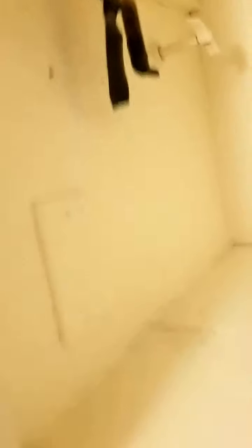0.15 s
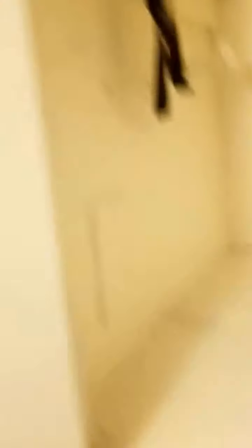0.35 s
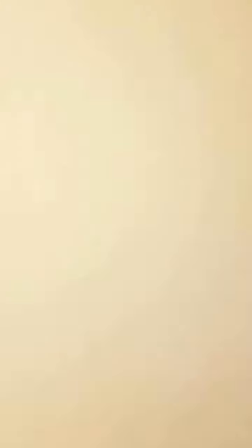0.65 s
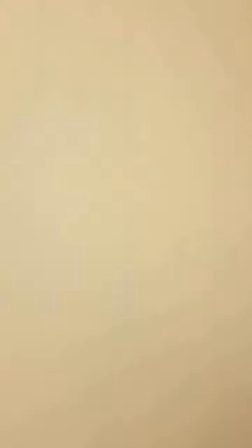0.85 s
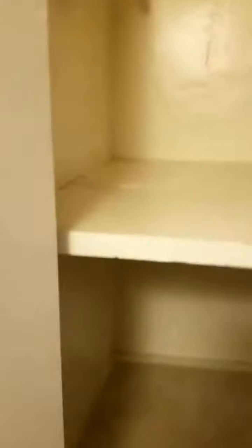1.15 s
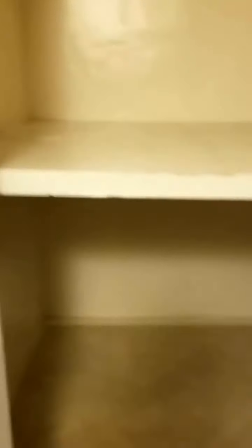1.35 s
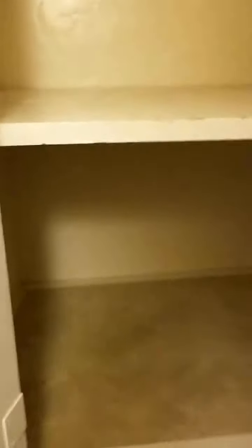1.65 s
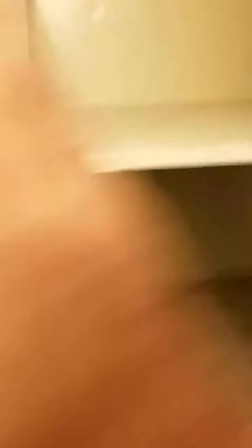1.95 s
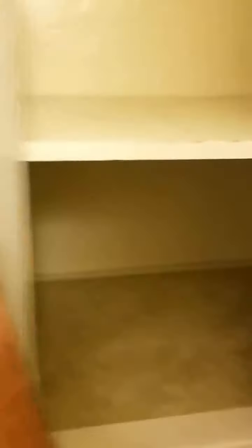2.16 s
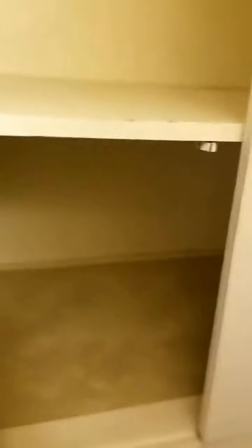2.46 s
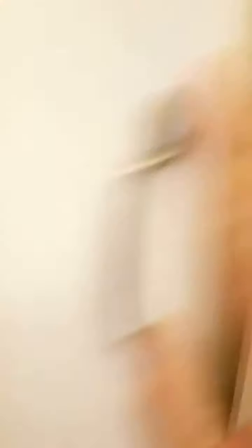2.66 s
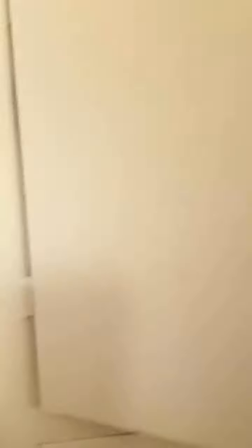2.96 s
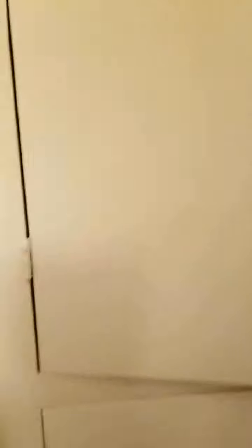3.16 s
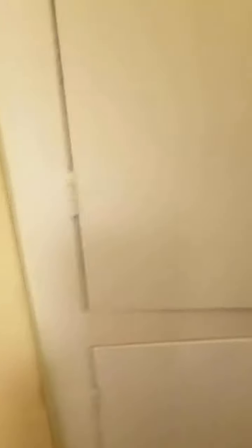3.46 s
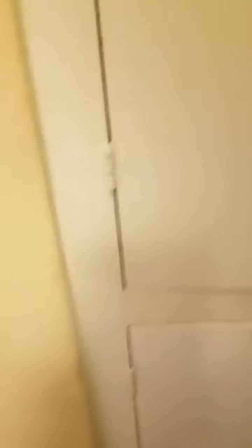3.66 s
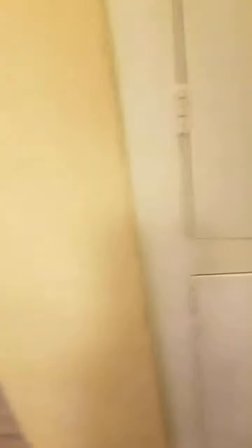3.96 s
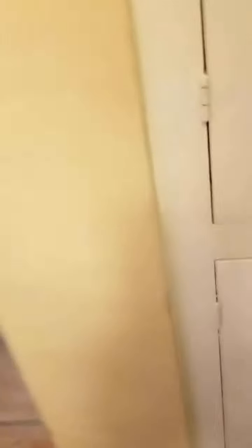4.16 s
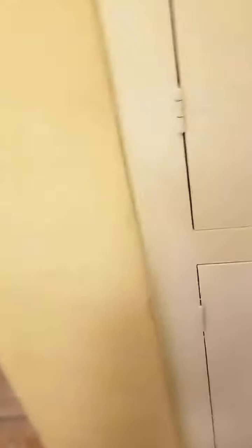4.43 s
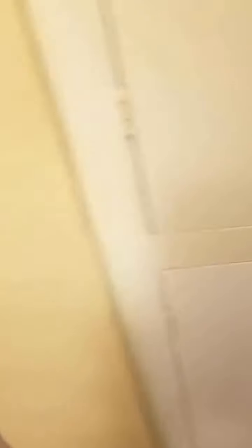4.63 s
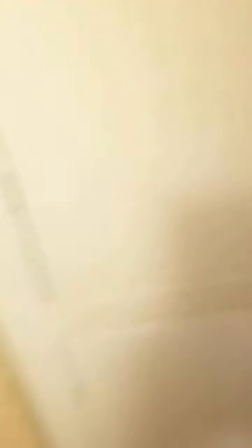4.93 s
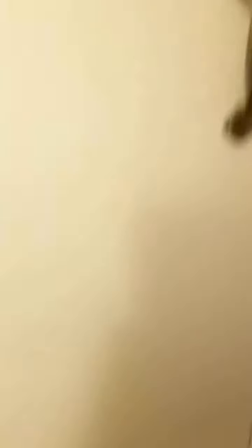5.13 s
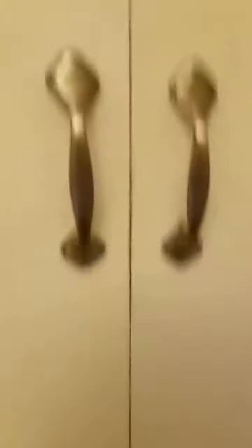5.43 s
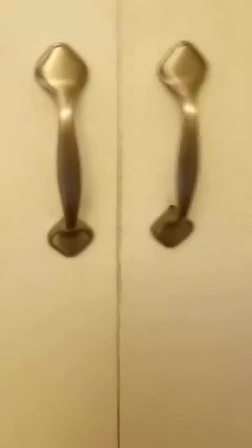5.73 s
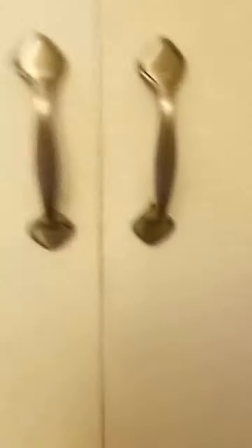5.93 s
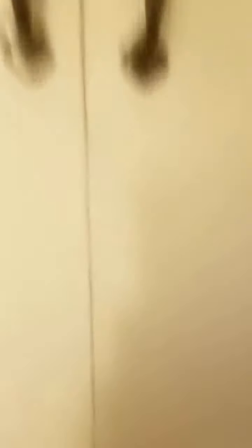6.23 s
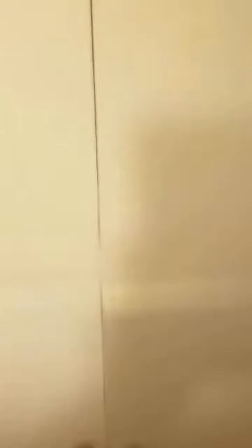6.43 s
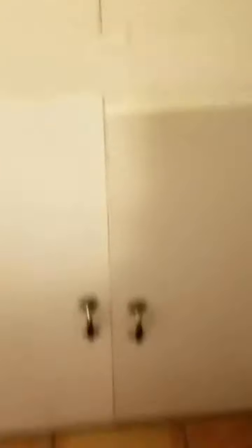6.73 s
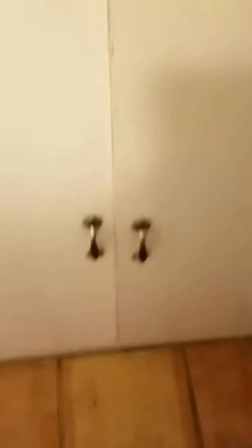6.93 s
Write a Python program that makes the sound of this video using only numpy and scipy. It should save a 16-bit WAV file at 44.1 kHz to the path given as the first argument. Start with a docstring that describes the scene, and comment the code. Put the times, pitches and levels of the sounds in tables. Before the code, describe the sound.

In a bare hallway, a soft knock and a footstep come before a wooden cupboard door slams close by with a sharp metal snap. About two seconds later a second door bangs shut, then a third, deeper one rattles into its catch. Each bang echoes for over a second. Afterwards there are only faint sleeve rustles, light taps and a dull step over a quiet room hush.

```python
"""Cupboard doors slammed in an empty house

Three wooden cupboard doors slam one after another in a bare hall. Each hits its frame, rebounds and
rattles: every contact is a crack of noise over booming panel modes, and the hall rings on for over a
second. Metal catches snap and clack. Between the slams someone steps about, handles the doors and
rustles a sleeve, over the hush of the rooms."""
import sys
import numpy as np
from scipy import signal
from scipy.fft import irfft
from scipy.io import wavfile
from scipy.ndimage import uniform_filter1d, minimum_filter1d

SR = 44100
rng = np.random.default_rng(int(sys.argv[2]) if len(sys.argv) > 2 else 0)


def output_pcm(signal):
    """Save a mono or channel-first signal as 16-bit PCM at the path in sys.argv[1].

    Samples are clipped to [-1, 1] before scaling.
    """
    pcm = np.clip(np.atleast_2d(signal).T, -1, 1) * 32767
    wavfile.write(sys.argv[1], SR, np.round(pcm).astype(np.int16))


N = 312644
MIC_GAP_M, SOUND_M_PER_S = 0.17, 343
RING = 2 ** 16  # samples given to one blow and its tail
RING_HZ, RING_S = np.fft.rfftfreq(RING, 1 / SR) + 1e-3, np.arange(RING) / SR
SCENE_HZ = np.fft.rfftfreq(N, 1 / SR) + 1e-3


def gain_of(db):
    """Decibels to amplitude."""
    return np.exp(np.asarray(db) * (np.log(10) / 20))


def curve(points, hz):
    """An EQ curve: points joined by straight lines over log frequency."""
    point_hz, value = np.transpose(points)
    return np.interp(np.log(hz + 1), np.log(point_hz + 1), value)


def hump(hz, octaves, steepness=2.92):
    """A broad resonance in dB around hz; octaves scales its width."""
    return -10 * steepness * np.log10(1 + (np.log2(RING_HZ / hz) / octaves) ** 2)


def add(mix, time, sound):
    """Mixes a sound in at a time in seconds."""
    part = mix[:, max(round(time * SR), 0):][:, :sound.shape[-1]]
    part += sound[..., :part.shape[1]]


def diffuse(colour_db, size):
    """Spectrum of unit-rms noise arriving from all sides at two spaced microphones."""
    hz = np.fft.rfftfreq(size, 1 / SR) + 1e-3
    a, b = np.exp(2j * np.pi * rng.random((2, len(hz))))
    coherence = .98 * np.sinc(2 * hz * MIC_GAP_M / SOUND_M_PER_S)  # centred bass, wide treble
    mid, side = a * np.sqrt((1 + coherence) / 2), b * np.sqrt((1 - coherence) / 2)
    gain = gain_of(colour_db) * hz ** 4 / (hz ** 4 + 28 ** 4)  # the microphones lose the deepest bass
    return np.array([mid + side, mid - side]) * gain * size / np.sqrt(2 * np.sum(gain ** 2))


def diffuse_noise(colour_db, size):
    """Wide stereo noise of a given colour, at unit rms."""
    return irfft(diffuse(colour_db, size), size)


def strike(colour_db, ring, crack_db, crack_t60):
    """A blow as decaying noise: a crack, the wood and near walls, then the slower tail of the hall."""
    # How a blow dies away, by band; ring scales the wood's t60 and the hall's amplitude.
    # (band [Hz], rise [s], base wood t60 [s], hall t60 [s], base hall level [dB])
    bands = [(50.7, 0.075, 0.74, 1.7, -13), (140.7, 0.018, 0.7, 1.57, -13), (366, 0.0013, 0.71, 1.996, -7),
             (1000, 0.001, 0.62, 1.99, -8.5), (2660, .001, 0.47, 1.33, -5.5),
             (5000, 0.0012, 0.36, 0.8, -4.5), (9600, 0.00081, 0.36, .6, -26.5)]
    noise, out = diffuse(colour_db, RING), np.zeros((2, RING))
    log_centres = np.log([band[0] for band in bands])
    crack = gain_of(crack_db - 60 * RING_S / crack_t60)
    for share, (_, rise, wood_t60, hall_t60, hall_db) in zip(np.eye(len(bands)), bands):
        wood = gain_of(-60 * RING_S / (wood_t60 * ring))
        hall = gain_of(hall_db - 60 * RING_S / hall_t60) * ring  # a short tick hardly fills the hall
        envelope = np.sqrt(crack ** 2 + wood ** 2 + hall ** 2) * (1 - np.exp(-RING_S / rise))
        crossover = np.interp(np.log(RING_HZ), log_centres, share)
        out += irfft(noise * crossover, RING) * envelope
    return out


def bump(db, hz, octaves, attack_s, ring):
    """A small blow with one broad resonance and a softened attack, in the same hall as the doors."""
    blow = strike(hump(hz, octaves), ring, crack_db=-2, crack_t60=0.017)
    return gain_of(db) * blow * (1 - np.exp(-RING_S / attack_s))


def room_tone(level_db=-56):
    """The steady hush of the empty rooms."""
    # Colour of the hush (frequency [Hz], relative level [dB])
    hush = [(25, -4.5), (60, -2), (115, 0.5), (170, -9), (330, -13), (800, -17.5), (1700, -16),
            (3000, -10.5), (6700, -29), (9500, -39), (15000, -36.5)]
    return gain_of(level_db) * diffuse_noise(curve(hush, SCENE_HZ), N)


def sleeve(body_build_s=0.051, fizz_droop_db_per_s=25, grain_db=.5):
    """Sliding cloth: each stroke swells, holds and ebbs; its fizz comes first and its body builds after."""
    # Colour of rubbing cloth (frequency [Hz], relative level [dB])
    cloth = [(290, -47), (500, -25.5), (623, -15), (795, -14.5), (1630, -9.5), (1830, -6), (2230, -5),
             (3590, -2.5), (6570, -5), (8000, -12.5), (10400, -80), (17600, -120)]
    # Arm movements (start [s], rise [s], length [s], hiss level [dB], body offset [dB], fizz offset [dB])
    strokes = [(0.0, 0.009, 0.057, -62.5, -1, -3), (0.193, .12, 0.17, -45.5, 8.5, -2),
               (0.694, 0.067, 0.16, -51.5, 0, 0.5), (1.035, 0.044, 0.057, -59.5, 2, -1),
               (1.198, 0.055, 0.14, -40.5, 2.5, -4), (2.158, .03, 0.1, -59, -1, -2),
               (2.678, 0.049, .3, -68, 6.5, 3), (4.788, .006, .035, -47, 5.5, -1.5),
               (5.412, 0.018, 0.082, -62, 7, 2), (5.585, 0.079, 0.064, -49.5, -1, 1),
               (6.066, 0.038, .08, -59, 3, -8), (6.273, 0.067, 0.12, -54.5, 0.5, -4),
               (6.573, 0.056, 0.18, -47.5, 0, -4.5), (6.836, 0.037, 0.057, -53, -1, -2.5)]
    cloth_db = curve(cloth, SCENE_HZ)
    body = diffuse_noise(cloth_db - 20 * np.log10(1 + (SCENE_HZ / 3500) ** 4), N)
    hiss = diffuse_noise(cloth_db - 20 * np.log10(1 + (3800 / (SCENE_HZ + 1)) ** 4), N)
    fizz = diffuse_noise(curve([(5000, -44.5), (8000, 3.0), (15000, 4.5)], SCENE_HZ), N)
    grain = uniform_filter1d(rng.standard_normal(N), 200)
    powers = np.zeros((3, N))  # hiss, body, fizz
    for start, rise, length, db, body_db, fizz_db in strokes:
        age = np.maximum(np.arange(N) / SR - start, 0)
        ebb_t60 = 0.44 + 3.5 * length  # longer strokes ebb more slowly
        ebb_db = -60 * np.maximum(age - length, 0) / ebb_t60
        level = np.minimum(age / rise, 1) * gain_of(db + ebb_db)
        body_share = gain_of(body_db) * (1 - np.exp(-age / body_build_s))
        fizz_share = gain_of(fizz_db - fizz_droop_db_per_s * age)
        powers += np.square([level, level * body_share, level * fizz_share])
    rustle = sum(np.sqrt(power) * layer for power, layer in zip(powers, (hiss, body, fizz)))
    return rustle * gain_of(grain_db * grain / grain.std())


def air_puff(time_s=2.871, level_db=-22, pitch_hz=111, width_s=0.0025, right_share=0.085):
    """One soft push of air, felt mostly by the left microphone port."""
    t = np.arange(N) / SR - time_s
    push = np.cos(2 * np.pi * pitch_hz * t) * np.exp(-(t / width_s) ** 2 / 2)
    return gain_of(level_db) * np.array([[1], [right_share]]) * push


def steps():
    """Heavy feet draw a dull, low thud from the floor."""
    # Footfalls (time [s], level [dB])
    footfalls = [(.505, -35), (1.17, -49), (2.93, -50), (6.725, -29), (6.781, -36), (6.868, -46)]
    out = np.zeros((2, N))
    for time, db in footfalls:
        add(out, time, bump(db, hz=82, octaves=.6, attack_s=0.01, ring=.78))
    return out


def knocks():
    """Hands and door edges knock on the wood; shelves and floor shudder around one pitch after a jolt."""
    # Light knocks (time [s], level [dB], centre [Hz], attack [s], ring [factor])
    taps = [(.455, -42.5, 443, 0.0053, 0.55), (0.497, -32.5, 1000, 0.0013, 0.5),
            (1.149, -46.5, 480, 0.0054, 0.49), (2.75, -49, 800, 0.0054, 0.79),
            (3.146, -50.5, 500, 0.0022, 1.7), (3.181, -35, 1900, 0.00058, 0.45),
            (5.59, -48, 526, 0.034, 1.24), (5.74, -52.5, 297, 0.0079, 0.7)]
    # Jolted boards (time [s], level [dB], centre [Hz], ring [factor])
    shudders = [(3.8, -35, 166.6, 0.38), (4.23, -16.5, 187, 1), (6.74, -54.5, 534, 3.4)]
    out = np.zeros((2, N))
    for time, db, hz, attack_s, ring in taps:
        add(out, time, bump(db, hz, octaves=1.3, attack_s=attack_s, ring=ring))
    for time, db, hz, ring in shudders:
        add(out, time, bump(db, hz, octaves=0.58, attack_s=.0065, ring=ring))
    return out


def fittings():
    """Hinges tick, a sleeve flicks briefly, a door rebounds, a door edge scrapes its frame and the catches
    clack home."""
    # Ticks of hinges and loose fittings, and brief high flicks of a sleeve (time [s], level [dB], centre [Hz])
    ticks = [(.682, -57.5, 3020), (0.907, -43.5, 4300), (1.645, -55, 10000), (2.068, -53, 5460),
             (3.547, -49, 10000), (3.805, -46.5, 4020), (5.028, -58, 4200)]
    # Doors seating in their catches (time [s], level [dB])
    clacks = [(3.333, -19.5), (4.3217, -14.5)]
    out = np.zeros((2, N))
    for time, db, hz in ticks:
        add(out, time, bump(db, hz, octaves=0.94, attack_s=0.0017, ring=0.21))
    hollow_rebound = bump(db=-11.5, hz=380, octaves=.3, attack_s=.0015, ring=.2)
    add(out, 3.337, hollow_rebound)  # the second door against its frame
    edge_scrape = bump(db=-33, hz=4500, octaves=0.89, attack_s=.022, ring=0.62)
    add(out, 4.29, edge_scrape)  # the third door, just before it shuts
    for time, db in clacks:
        add(out, time, bump(db, hz=2350, octaves=.39, attack_s=0.00092, ring=0.24))
    return out


def metal_snaps(t60=0.009, rise_s=0.00043, echo_db=-22, echo_t60=0.1):
    """Metal catches and hinges snap for a few milliseconds, with a faint spray of echoes."""
    # Snaps of the metalwork (time [s], level [dB], centre [Hz])
    snaps = [(1.4665, -14.5, 3360), (1.473, -3.5, 2150), (3.2734, -23, 4520), (3.284, -32, 6800),
             (3.3387, -32.5, 6840), (3.37, -31.5, 8500), (4.32, -15.5, 3960), (4.3282, -12, 5200),
             (4.336, -10.5, 2260), (4.421, -42, 12000)]
    out = np.zeros((2, N))
    envelope = gain_of(-60 * RING_S / t60) + gain_of(echo_db - 60 * RING_S / echo_t60)
    envelope *= 1 - np.exp(-(RING_S / rise_s) ** 2)
    for time, db, hz in snaps:
        add(out, time, gain_of(db) * envelope * diffuse_noise(hump(hz, octaves=0.31), RING))
    return out


def wood_ripple(spacing_hz=34):
    """The many lesser modes of a panel: random peaks and dips in dB, deepest near 1 kHz."""
    heights = np.clip(rng.standard_normal(4096), -2, 2)
    ripple = np.interp(RING_HZ / spacing_hz, np.arange(len(heights)), heights)
    depth_db = 3.5 * curve([(450, 0.16), (1000, 1), (4000, 0.58), (8000, 0.42)], RING_HZ)
    return depth_db * ripple


def panel_boom(modes, rise_s=0.0015, twin_db=-6, max_beat_hz=9, twin_rise_s=0.14):
    """A door's strong modes, each with a close twin that swells in and beats against it."""
    out = np.zeros((2, RING))
    twin_swell = gain_of(twin_db) * (1 - np.exp(-RING_S / twin_rise_s))
    for hz, db, t60 in modes:
        # higher modes reach the two microphones out of step
        skew = np.pi * hz * MIC_GAP_M / SOUND_M_PER_S * rng.uniform(-1, 1) * np.array([[1], [-1]])
        detune_hz = max_beat_hz * rng.uniform(.5, 1) * rng.choice([-1, 1])
        main = np.sin(2 * np.pi * hz * RING_S + skew)
        twin = twin_swell * np.cos(2 * np.pi * (hz + detune_hz) * RING_S - skew)
        out += gain_of(db - 60 * RING_S / t60) * (main + twin)
    return out * (1 - np.exp(-RING_S / rise_s))


def door_slams():
    """Each contact with the frame rings the door; hard contacts are brighter, soft ones mostly boom."""
    # Hits and rebounds (time [s], door, bang level [dB], hardness [dB/octave], boom level [dB])
    contacts = [(1.4572, "first", -13, 0, -23.5), (1.468, "first", -12, -0.5, -39),
                (1.4965, "first", -13, -5.5, -17), (3.266, "second", -9, 1, -22),
                (3.299, "second", -12, -0.5, -30), (3.332, "second", -16.5, .5, -24),
                (3.339, "second", -18, -1, -23.5), (4.1371, "third", -8, 2.5, -20.5),
                (4.156, "third", -20.5, 9.5, -24.5), (4.227, "third", -19, -9.5, -17.5),
                (4.292, "third", -14.5, 2, -25.5), (4.321, "third", -10.5, 4, -36.5),
                (4.347, "third", -20.5, -4.5, -36)]
    # Colour of each door's dense ring (frequency [Hz], relative level [dB])
    panel_colours = {"first": [(18, -60.5), (30, -31), (79, -6), (176, -15.5), (260, -13), (304, -17.5),
                     (394, -6.5), (460, -23.5), (552, -11), (629, -19.5), (881, -12), (1520, -17),
                     (2030, -16), (15000, -61.5)], "second": [(18, -38), (30, -7), (92, 2), (154, -5.5),
                     (195, -7), (328, -7.5), (364, -7.5), (460, -14), (662, -14.5), (881, -15), (2370, -18),
                     (6880, -43), (8040, -55), (15000, -53)], "third": [(18, -49), (30, -1), (150, -10),
                     (180, 0.5), (222, -11.5), (415, -9.5), (460, -13), (581, -8.5), (905, -19.5),
                     (1300, -14.5), (2430, -26.5), (2990, -32.5), (8250, -61.5), (15000, -71.5)]}
    # Strong modes of each door and its cupboard (frequency [Hz], relative level [dB], t60 [s])
    door_modes = {"first": [(90, 10.5, 0.2), (268.3, 4.5, 0.53), (327, -12.5, 0.88), (384, -7, 0.64),
                  (568, -25, 1.5), (665, -8.5, 0.85), (719, -20, 0.73), (842, -24, 1.5), (950, -21, 1.3)],
                  "second": [(96.7, 0, 0.27), (184.5, -3.5, 1.09), (371.8, 5, 0.49), (500, 3, 0.64),
                  (568, -14, 1.6), (684, -7.5, 0.74), (990, -27, 0.68), (1180, -26, 1.3),
                  (1320, -11.5, 1.3), (1480, -12, 0.39), (1660, 8, 0.11), (1820, -25, 0.95),
                  (2020, -12, 0.51), (2190, -9.5, 0.47), (2360, -34, 1), (2430, -37.5, 0.52)],
                  "third": [(57, -14, 1.6), (94.3, -6, 0.63), (116.4, -7, 1.4), (133.8, -7, 1.15),
                  (181.3, 4, 0.58), (192.2, -4.5, 1.4), (262.9, -4.5, 1.2), (418, -13.5, 1.94),
                  (502, -14, 1.3), (579, -11, .6), (646, -19.5, 0.61), (1240, -14, 0.61), (1340, -8, .5),
                  (1633, -12.5, 0.2), (1880, -24.5, 0.6), (1970, -15.5, 0.47)]}
    out = np.zeros((2, N))
    booms = {door: panel_boom(modes) for door, modes in door_modes.items()}
    panel_db = {door: curve(points, RING_HZ) + wood_ripple() for door, points in panel_colours.items()}
    tilt_octaves = np.log2(np.clip(RING_HZ, 100, 5000) / 700)  # hardness tilts the tone about 700 Hz
    for time, door, bang_db, hardness, boom_db in contacts:
        bang = strike(panel_db[door] + hardness * tilt_octaves, ring=0.66, crack_db=-3, crack_t60=.05)
        add(out, time, gain_of(bang_db) * bang + gain_of(boom_db) * booms[door])
    return out


def scene():
    """The slams and their metalwork up front, small movements and the hush behind."""
    slams = door_slams() + metal_snaps() + fittings()
    return slams + knocks() + steps() + air_puff() + sleeve() + room_tone()


def record(dry):
    """A fast limiter holds the bangs down; a steep low-pass then trims the top of the treble."""
    ceiling, window_samples, cutoff_hz = .97, 65, 15900
    allowed_gain = np.minimum(1, ceiling / (abs(dry).max(0) + 1e-9))
    smooth_gain = uniform_filter1d(minimum_filter1d(allowed_gain, window_samples), window_samples)
    lowpass = signal.firwin(511, cutoff_hz, window=("kaiser", 9), fs=SR)
    return signal.oaconvolve(dry * smooth_gain, lowpass[None], "same")


dry = scene()
out = record(dry)
output_pcm(out)
```